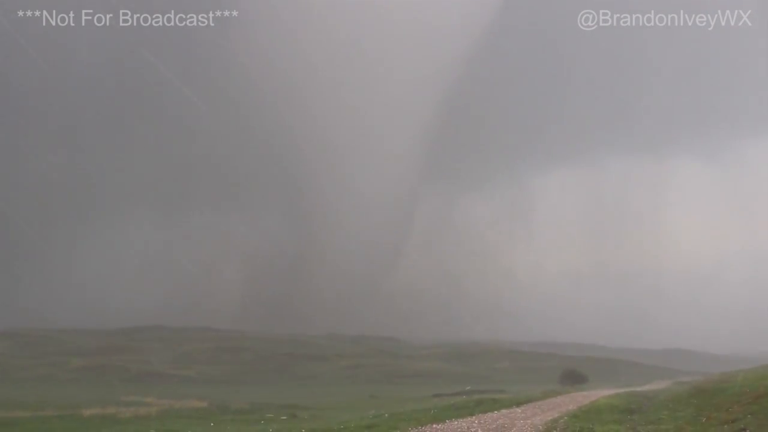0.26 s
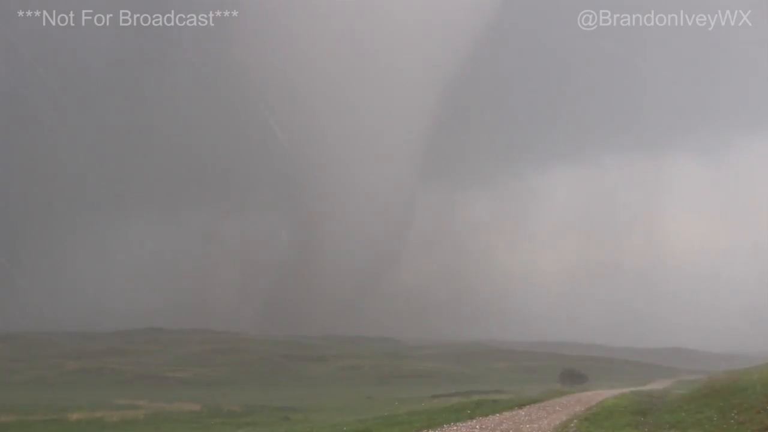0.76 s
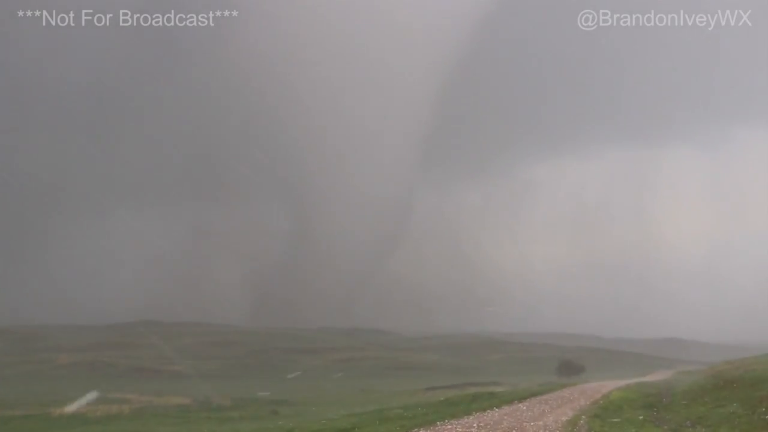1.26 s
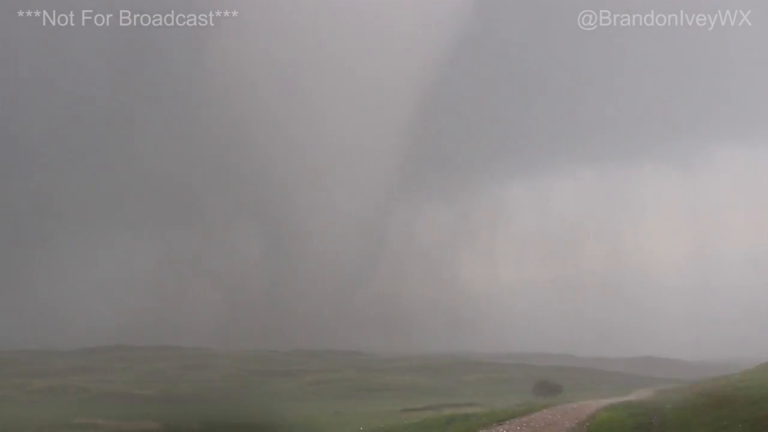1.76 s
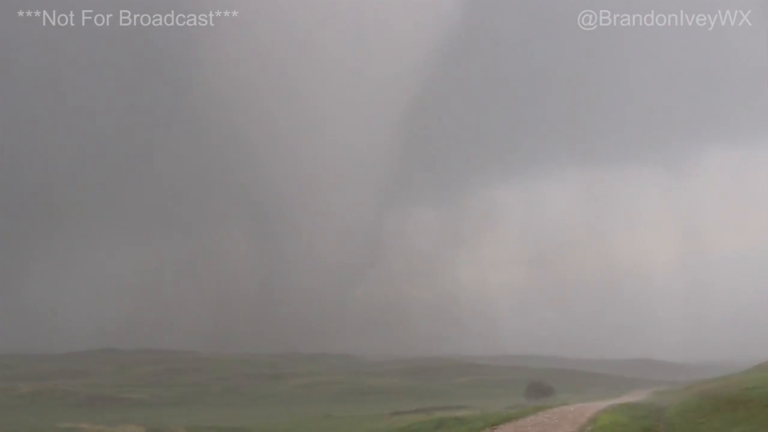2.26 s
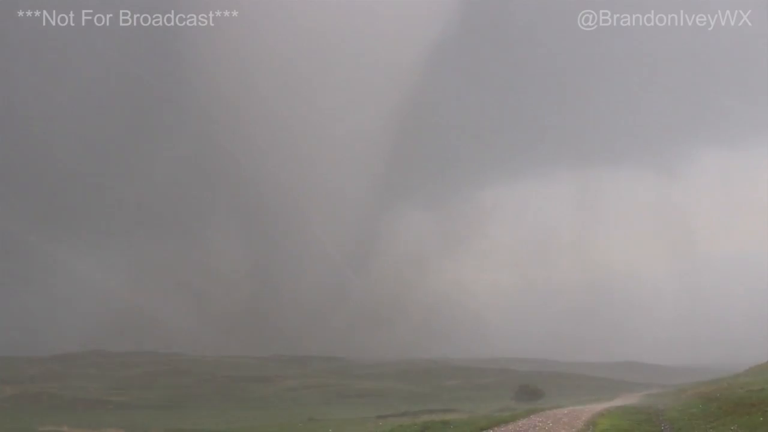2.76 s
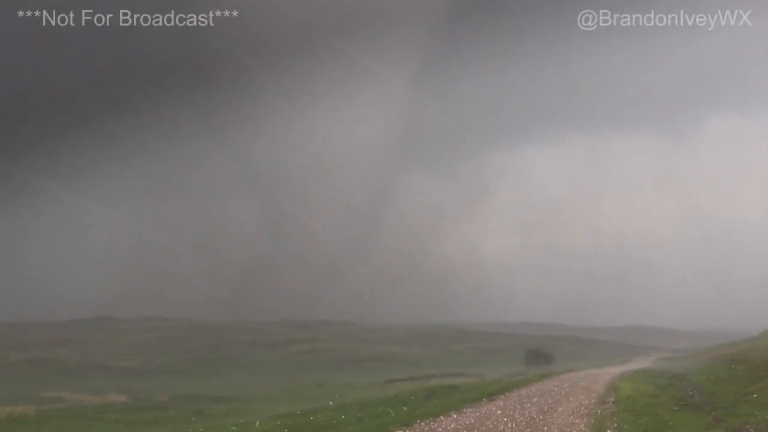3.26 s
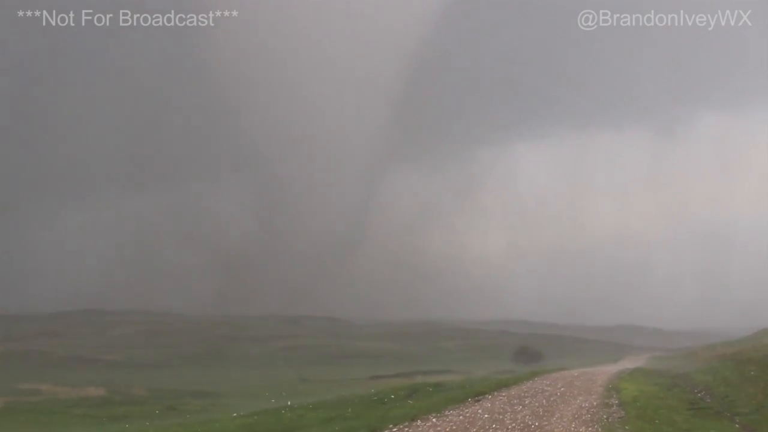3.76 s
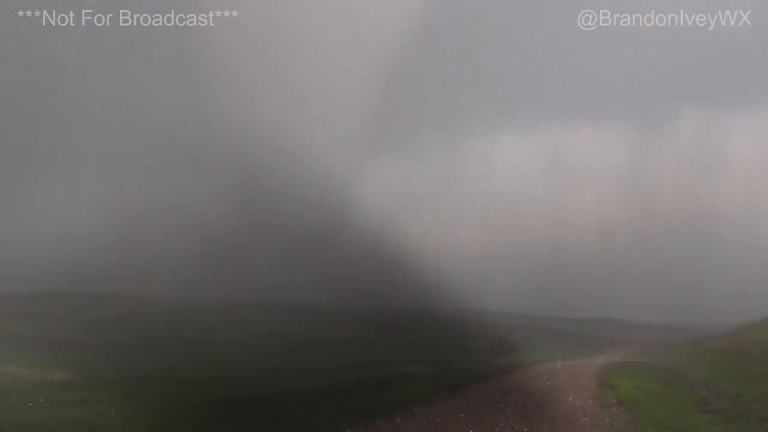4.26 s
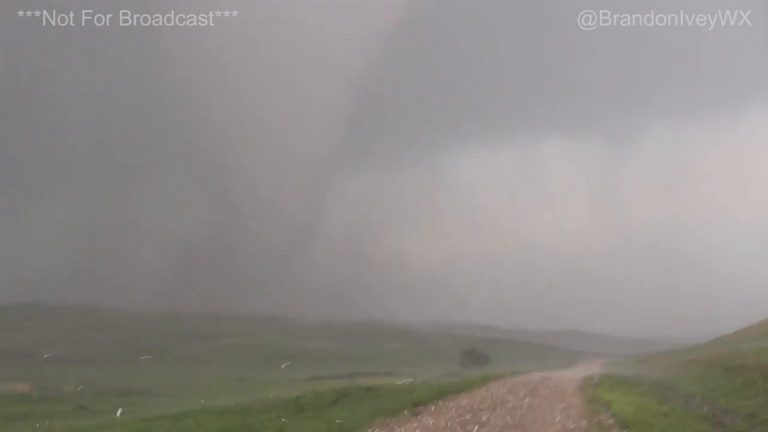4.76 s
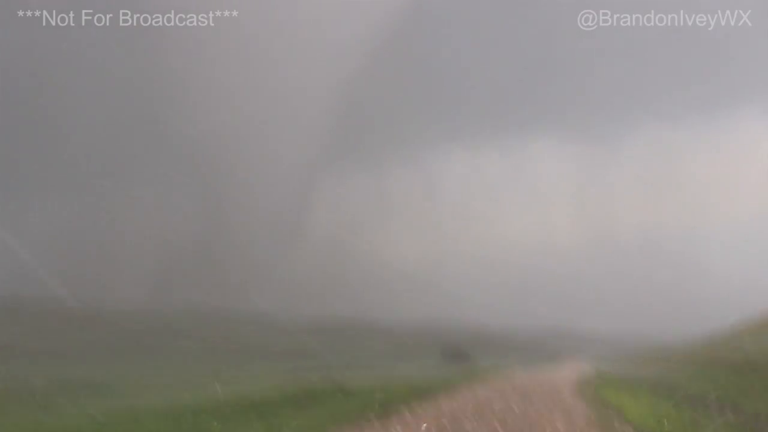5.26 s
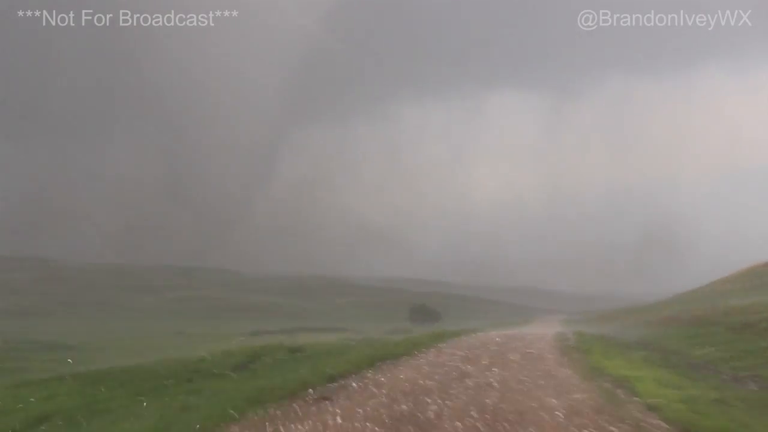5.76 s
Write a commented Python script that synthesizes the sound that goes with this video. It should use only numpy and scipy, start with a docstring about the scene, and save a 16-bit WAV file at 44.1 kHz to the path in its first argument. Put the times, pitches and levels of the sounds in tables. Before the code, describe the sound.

Inside a car rolling along a gravel road, wind and road noise rumble through the body under a faint patter of rain. Hailstones crack on the windscreen and knock on the roof throughout, close and irregular, each ringing briefly. Hard blows about a second in distort and briefly push the sound down. Rain and rumble sink near the middle, then return with more hard hits, the patter loudest just before the end.

```python
"""Inside a car rolling along a gravel road in a hailstorm, one microphone in the cabin, six seconds.
It opens on wind and road rumbling through the body, a faint patter of rain, and hailstones close by that
crack on the windscreen and knock on the roof, each ringing briefly. Around 1 s hard blows clip and duck
the gain control, and the rumble creeps back. Rain and rumble, as heard, sink in level near 2.6 s and
come back up; more hard blows follow, and the patter is loudest just before the end."""
import sys
import numpy as np
from scipy import signal
from scipy.fft import rfft, irfft
from scipy.io import wavfile
from scipy.ndimage import uniform_filter1d

SR = 44100
rng = np.random.default_rng(int(sys.argv[2]) if len(sys.argv) > 2 else 0)


def int16_out(signal):
    """Quantize to a 16-bit WAV file."""
    q = np.round(np.clip(np.atleast_2d(signal).T, -1, 1) * 32767)
    wavfile.write(sys.argv[1], SR, q.astype(np.int16))


N = 265041

# Level of the rumble before the gain control, sinking and rising. Each row: time in seconds, relative level in
# dB.
RUMBLE_LEVEL = [(0.0, -24.5), (0.58, -21.5), (0.85, -13), (1.12, -12), (1.35, -15.5), (1.85, -11.5),
                (2.25, -14), (2.55, -22.5), (2.93, -16.5), (3.3, -16.5), (3.45, -13), (3.62, -19.5),
                (4.2, -9), (4.4, -13.5), (4.95, -9), (5.4, -11.5), (5.7, -15.5), (6.0, -13.5)]
# Boom of wind and road inside the cabin. Each row: frequency in Hz, relative spectral level in dB.
CABIN_BOOM = [(12, -32), (25, -11.5), (52, -0.5), (64, -7), (86, 2.5), (112, -7.5), (136, 2.5), (155, -4.5),
              (180, -1.5), (255, -7.5), (320, -16.5), (500, -21.5), (800, -34.5), (1500, -82.5)]
# Level of the patter before the gain control, sinking and rising. Each row: time in seconds, relative level in
# dB.
RAIN_LEVEL = [(0.0, -43.5), (0.42, -42), (0.65, -32.5), (1.0, -24.5), (1.22, -31), (1.8, -30), (2.38, -31),
              (2.6, -42.5), (3.2, -26), (3.65, -32), (4.0, -33), (4.45, -22), (4.8, -30), (5.25, -26.5),
              (5.8, -17), (6.0, -23.5)]
# Rain as heard from under the roof. Each row: frequency in Hz, relative spectral level in dB.
RAIN_SPECTRUM = [(150, 3), (400, 2.5), (700, 0), (1200, 0.5), (2200, -3.5), (3700, -7.5), (5500, -16),
                 (8000, -24.5), (11000, -31), (15500, -35)]
# Stones on the car. Each row: start in seconds, relative level in dB, thud in dB, hardness in dB,
# direct over diffuse sound at the microphone in dB, ring of the struck spot in Hz.
HAILSTONES = [(0.028, -13.5, -1.5, -10.5, -17, 450), (0.1171, -23, -3, 10, 1.5, 6700),
              (0.164, -29.5, 1, -1.5, -1, 1220), (0.287, -10, -7, -1.5, 9, 3500),
              (0.328, -20.5, 2, 3, -10, 2270), (0.364, -24.5, -2, 5, 10, 2900),
              (0.398, -15.5, -2.5, -7.5, -1, 910), (0.5, -30, 8, -10, -1, 2230),
              (0.558, -8, 3.5, -6, -1, 2170), (0.583, -24.5, 11, 14, 3, 710),
              (0.632, -16, 15, 4.5, -5, 860), (0.667, 6, 8.5, 1.5, 4.5, 3100),
              (0.758, -30.5, -1, 12, -5, 3000), (0.8, -24.5, 6.5, 2, 1, 1200),
              (0.895, -18, -7, -3, -4, 5150), (0.97, -10, 1, 3, 6, 2120), (0.984, 9, 5, -2.5, 10, 1560),
              (1.1054, -8.5, -9, -5.5, 10, 3330), (1.1839, 11.5, 1, 8.5, 10.5, 1210),
              (1.381, -14, -3.5, 6, 12, 3300), (1.478, -19.5, 4, 9, -9, 2580),
              (1.511, -22.5, -5, 1, -5, 890), (1.553, -4.5, 1, 3.5, -24, 1080),
              (1.712, -5, 2, 0.5, -8.5, 1840), (1.764, -19.5, -3, 1, -1, 4400),
              (1.887, -5, 0.5, 10, 11, 1870), (1.945, -19, 1.5, 4, -7, 2360),
              (2.1512, -5.5, -11, -5, 8.5, 1190), (2.219, -23.5, 2, -3, -3, 1010),
              (2.269, -7.5, 0.5, 12.5, 9, 3570), (2.388, -19.5, -10, -0.5, -6, 1860),
              (2.409, -10, 1, 20.5, 0.5, 4070), (2.489, -12.5, -12, 3, 14, 2650),
              (2.73, -34, 1, 1.5, -7, 1600), (2.863, -21.5, 3.5, -3, -6.5, 2400),
              (2.9, -28, 3, 19, 12, 5060), (3.023, -21.5, -3, 3, -9, 724), (3.0675, -4, 1.5, 0, 0.5, 3050),
              (3.142, -12.5, -2.5, -12, -5, 810), (3.186, -10.5, -1, -6, 0.5, 740),
              (3.269, -17, -24, -6, -6, 1370), (3.342, -33, 13.5, 13, 10, 1530),
              (3.441, -19.5, -6, 2, 8, 3500), (3.471, -23.5, -3, 3, -18, 930),
              (3.565, -1, -3.5, -12, -13.5, 930), (3.643, -21, 6, -14, -3, 1210),
              (3.769, -21, 1, -1.5, 1, 3100), (3.83, -29, 0, -2, -8, 1500),
              (3.942, -19.5, 6, 4.5, 10, 1670), (4.015, 3, 4, -13, 4, 524), (4.125, -26.5, 1, 5, 0, 950),
              (4.178, -10.5, -3, -5, 3, 1720), (4.2287, -2, -2.5, -3, 0, 1360),
              (4.385, -10, 8.5, 11, 6, 2550), (4.45, -14.5, 7, 2.5, -2, 4730),
              (4.465, -9.5, 1, -2, 16, 5800), (4.4902, 8.5, 2, 6.5, 5, 3400),
              (4.572, 2.5, -5, -3, -4, 1350), (4.587, -1, 5, 7, 6.5, 3670), (4.672, -16.5, 0, 2, 6, 2970),
              (4.833, -27, 0, -7, 4, 1850), (5.023, -4.5, -1.5, -9.5, -8, 975),
              (5.105, -29.5, 6, 10, -8, 1200), (5.18, -17.5, 5, 10, 24, 2000),
              (5.1965, 3.5, -4, -5, 9, 1410), (5.325, -13.5, 2, 1.5, -16, 1860),
              (5.373, 3.5, 4, -3.5, -2.5, 520), (5.434, -1, 4.5, -12, -3, 550),
              (5.562, -16.5, -2, -2, -1, 3840), (5.622, -16.5, 7, -2, -9, 1030),
              (5.677, -4, -1, 3.5, 1, 2550), (5.779, 4.5, 2.5, 1.5, 0.5, 4320),
              (5.87, -13, 2, -26, 0, 1660), (5.997, -5, 1, 7.5, 14, 2000)]
# The bands of a blow. In order: thud, neutral middle, crack and sizzle, each in Hz.
BLOW_BANDS_HZ = [500, 1400, 3400, 8000]
# A blow on glass and sheet metal. Each row: frequency in Hz, gain in dB.
PANEL_SPECTRUM = [(60, -17), (180, -3.5), (400, 0.5), (750, -3), (1050, -0.5), (1500, -2.5), (2200, -1),
                  (3300, -4), (4500, -6), (6500, -14), (10000, -24.5), (15500, -28)]
# Ring of panels and cabin. Each row: frequency in Hz, seconds to fall by 60 dB.
RING_TIMES = [(200, 0.13), (1000, 0.13), (3500, 0.1), (10000, 0.083)]
# Narrow peaks and one notch that colour every blow. Each row: centre in Hz, width in Hz, gain in dB.
PEAKS_AND_NOTCH = [(416, 84, 2.5), (592, 60, 3.5), (1027, 45, 0), (1540, 32, 2.5), (5940, 34, -10)]


def undb(db):
    """Decibels to gain."""
    return 10 ** (np.asarray(db) / 20)


def unit(x):
    """Scale to rms 1."""
    return x / np.sqrt(np.mean(x ** 2) + 1e-18)


def curve(rows):
    """Rows of (s, value) joined by straight lines."""
    return np.interp(np.arange(N) / SR, *np.transpose(rows))


def over_hz(hz, points):
    """Read (Hz, value) points on a log-frequency axis."""
    point_hz, value = np.transpose(points)
    return np.interp(np.log(hz + 1e-3), np.log(point_hz), value)


def bins(size):
    """Frequencies of the spectrum of size samples."""
    return np.arange(size // 2 + 1) * SR / size


def colour(x, points):
    """Filter by a spectrum of (Hz, dB) points."""
    return irfft(rfft(x) * undb(over_hz(bins(len(x)), points)), len(x))


def minimum_phase(db):
    """Causal response of a gain curve: nothing sounds before the blow."""
    cepstrum = irfft(np.log(undb(db)))
    half = len(cepstrum) // 2
    cepstrum[1:half] *= 2
    cepstrum[half + 1:] = 0
    return np.exp(rfft(cepstrum))


def fade(t, t60):
    """Exponential decay that loses 60 dB in t60 seconds."""
    return np.exp(-np.log(1000) * t / t60)


def wander(per_s):
    """Glide between random levels, per_s of them a second; rms 1."""
    hold = int(SR / per_s)
    steps = np.repeat(rng.standard_normal(N // hold + 1), hold)
    return unit(uniform_filter1d(steps, hold)[:N])


def smooth(x, lag_s):
    """One-pole smoothing."""
    keep = np.exp(-1 / (lag_s * SR))
    return signal.lfilter([1 - keep], [1, -keep], x)


def rumble(gain_db=2.17, buffet_db=1.18):
    """Gusts and gravel shake the body; the cabin booms around the microphone at its low resonances."""
    boom = unit(colour(rng.standard_normal(N), CABIN_BOOM))
    return boom * undb(curve(RUMBLE_LEVEL) + gain_db + buffet_db * wander(per_s=14))


def rain(drops_per_s=62, scatter_db=4.2, drop_t60=0.1, near_db=-1.5, far_db=-4.0, size=4096, count=2000):
    """Near drops of uneven size ring the body; countless finer ones farther off merge into a hiss."""
    gaps, weights = -np.log(1 - rng.random((count, 2))).T  # exponential draws
    starts = (np.cumsum(gaps) * SR / drops_per_s).astype(int)
    strengths = undb(scatter_db * np.minimum(weights, 3))
    t = np.arange(size) / SR
    envelope = fade(t, drop_t60) + 0.71 * fade(t, 0.0069)  # a brief ring behind the tick of the splash
    drops = np.zeros(N + size)
    for start, strength in zip(starts[starts < N], strengths):
        drops[start:start + size] += strength * envelope * rng.standard_normal(size)
    near = undb(near_db) * unit(drops[:N])
    far = undb(far_db) * rng.standard_normal(N)
    return unit(colour(near + far, RAIN_SPECTRUM)) * undb(curve(RAIN_LEVEL))


def cabin_ring(t):
    """Countless panel and cabin modes ring around the microphone; the high ones die first."""
    noise, hz = rfft(rng.standard_normal(len(t))), bins(len(t))
    centres, t60s = np.transpose(RING_TIMES)
    bands = [over_hz(hz, np.c_[centres, one_band]) for one_band in np.eye(len(RING_TIMES))]
    return sum(irfft(noise * band) * fade(t, t60) for band, t60 in zip(bands, t60s))


def struck_spot(hz, thud_db, hard_db, ring_hz, crack_share=0.42, ring_db=6, ring_per_hard=0.19):
    """The panel's response: a harder contact lifts crack and sizzle and weakens the spot's own ring."""
    tone_db = over_hz(hz, np.c_[BLOW_BANDS_HZ, [thud_db, 0, crack_share * hard_db, hard_db]])
    ring_width_hz = 220 + 0.2 * ring_hz
    bands = [*PEAKS_AND_NOTCH, (ring_hz, ring_width_hz, ring_db - ring_per_hard * hard_db)]
    bands_db = sum(db / (1 + (2 * (hz - centre) / width) ** 2) for centre, width, db in bands)
    return minimum_phase(over_hz(hz, PANEL_SPECTRUM) + tone_db + bands_db)


def panel_flex(t, push_db, hz=175, t60=0.08, gain_db=-13, max_push_db=12):
    """A heavy, square blow close by dents the panel, which springs back with a low knock."""
    return undb(gain_db + min(push_db, max_push_db)) * np.sin(2 * np.pi * hz * t) * fade(t, t60)


def hailstone(thud_db, hard_db, direct_db, ring_hz, size=8192, build_s=0.0038, direct_t60=0.054):
    """One blow: the click and close reflections reach the microphone first, then the cabin fills."""
    t = np.arange(size) / SR
    direct = rng.standard_normal(size) * fade(t, direct_t60)
    direct[0] += 4.7  # the contact click
    diffuse = cabin_ring(t) * (1 - np.exp(-t / build_s))
    blow = undb(direct_db) * direct + diffuse
    blow = irfft(rfft(blow) * struck_spot(bins(size), thud_db, hard_db, ring_hz))
    onset_rms = np.sqrt(np.mean(blow[:SR // 40] ** 2))  # the first 25 ms
    return blow / onset_rms + panel_flex(t, push_db=direct_db + thud_db)


def hail(gain_db=0.76):
    """Stones strike windscreen and roof one after another, a short way from the microphone."""
    out = np.zeros(N)
    for start_s, level_db, *character in HAILSTONES:
        start = int(start_s * SR)
        blow = hailstone(*character)[:N - start]
        out[start:start + len(blow)] += undb(level_db + gain_db) * blow
    return out


def gain_control(x, limit_db=-11, sense_s=0.002, attack_s=0.0056, recover_db_per_s=24.5, low_cut_hz=417):
    """Turn down quickly by the excess over the limit, then creep back up; the bass hardly counts."""
    sensed = signal.sosfilt(signal.butter(2, low_cut_hz, "high", fs=SR, output="sos"), x)
    level_db = 10 * np.log10(smooth(sensed ** 2, sense_s) + 1e-18)
    excess_db = np.maximum(level_db - limit_db, 0)
    recovery_db = recover_db_per_s * np.arange(N) / SR
    duck_db = np.maximum.accumulate(excess_db + recovery_db, axis=-1) - recovery_db
    return x * undb(-smooth(duck_db, attack_s))


def scene():
    """Hail, rain and rumble meet at one microphone in the cabin."""
    return (hail() + rain() + rumble())[None]


def record(dry, top_hz=15600):
    """The microphone feeds a gain control; what gets past it clips at full scale; the top is cut."""
    clipped = np.clip(gain_control(dry), -1, 1)
    high_cut = signal.ellip(10, 0.2, 80, top_hz, fs=SR, output="sos")
    return signal.sosfilt(high_cut, clipped)


dry = scene()
out = record(dry)
int16_out(out)
```